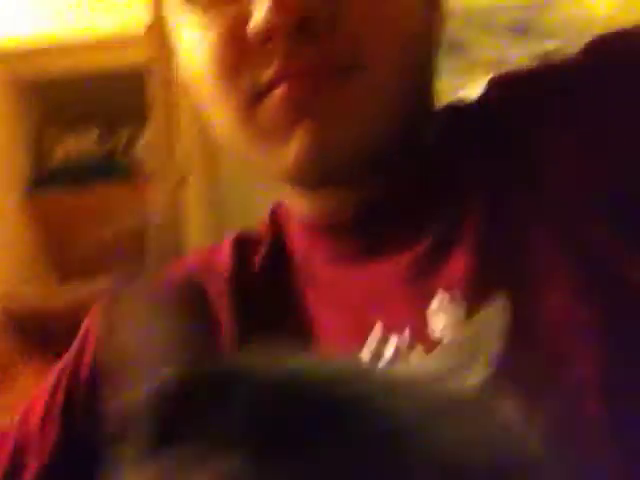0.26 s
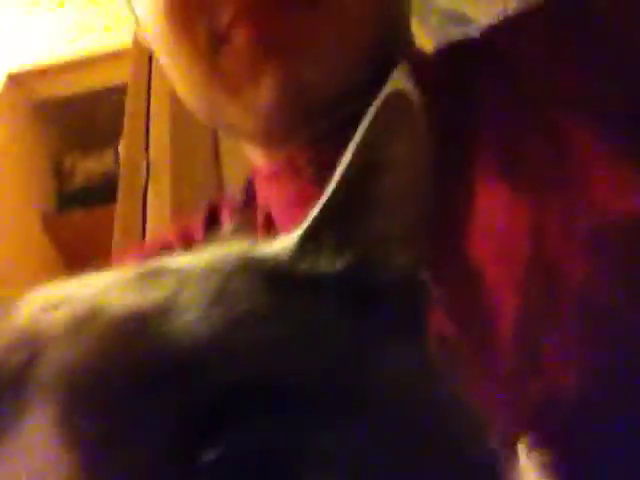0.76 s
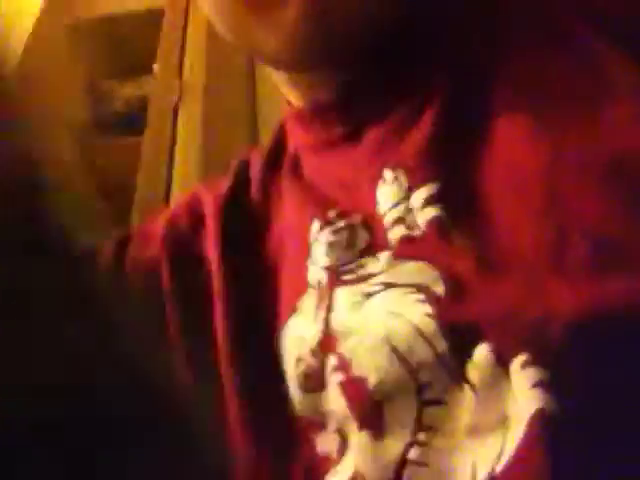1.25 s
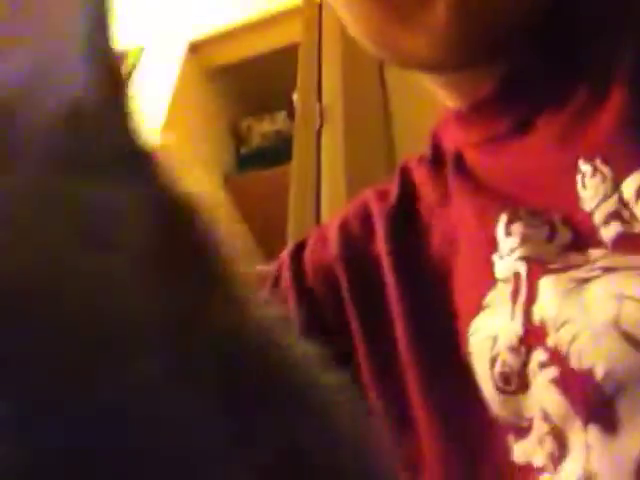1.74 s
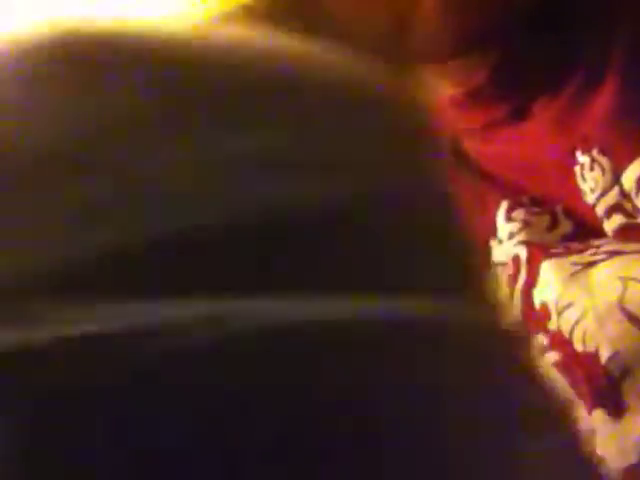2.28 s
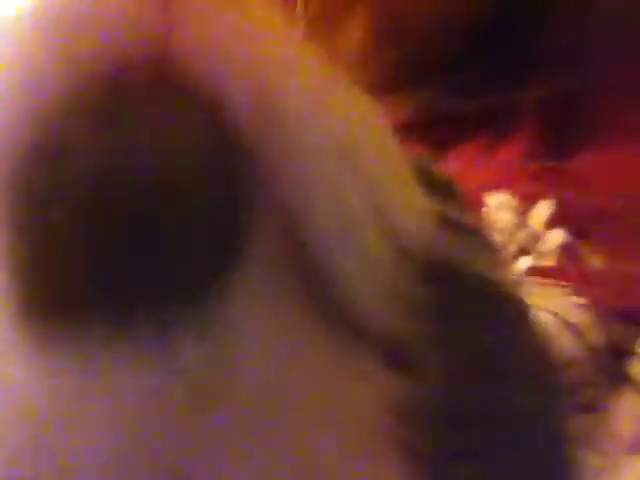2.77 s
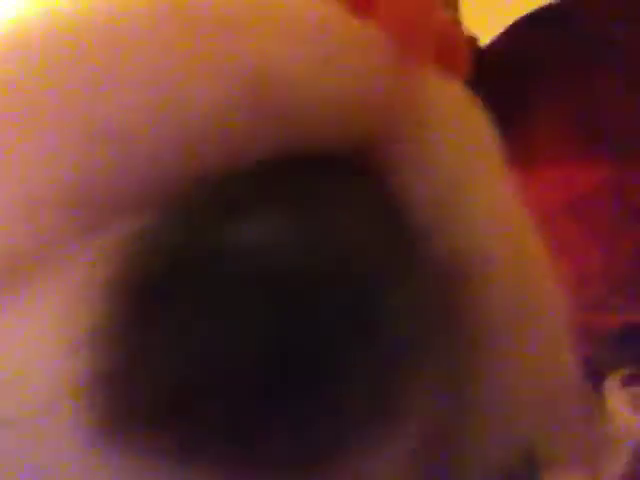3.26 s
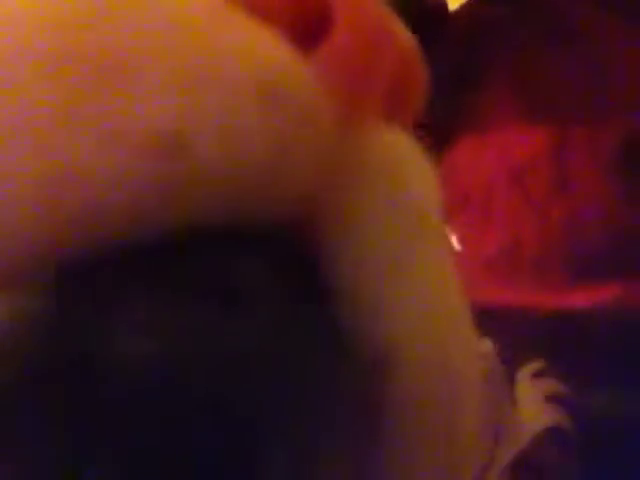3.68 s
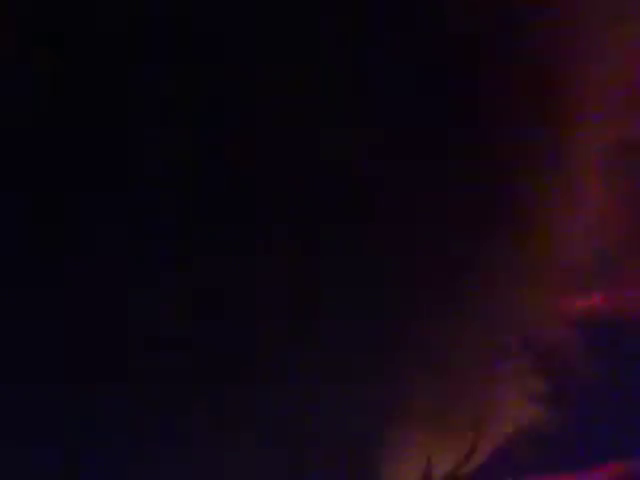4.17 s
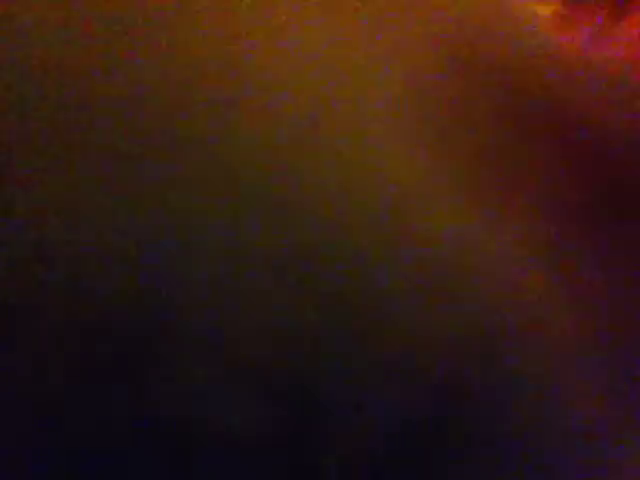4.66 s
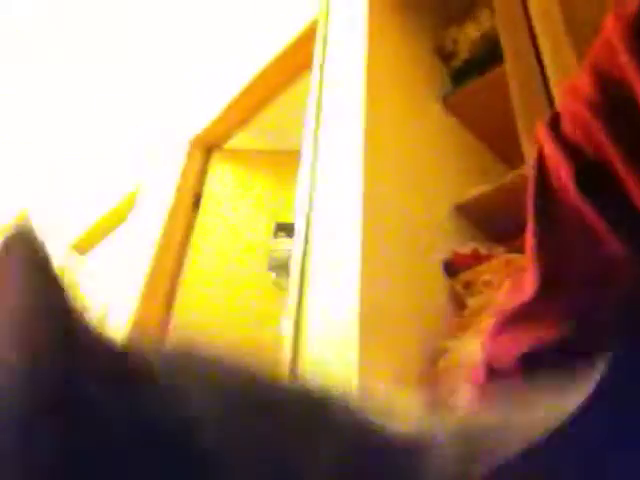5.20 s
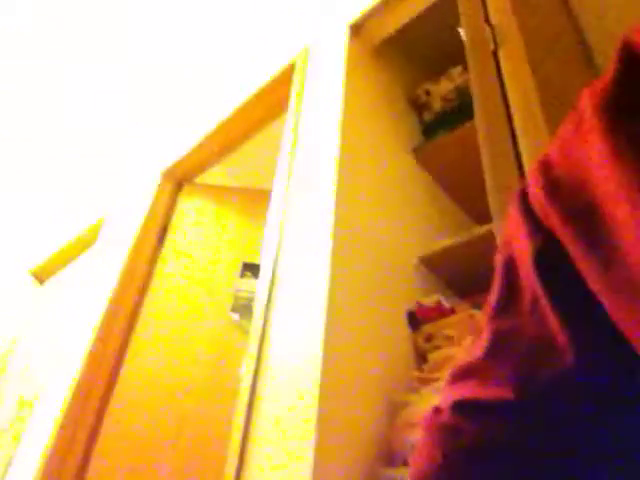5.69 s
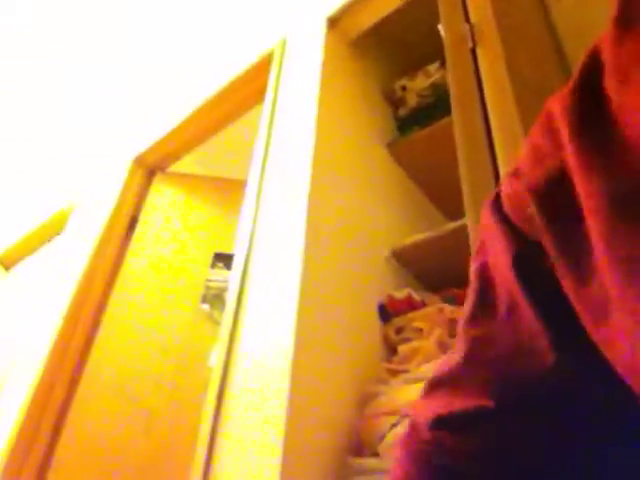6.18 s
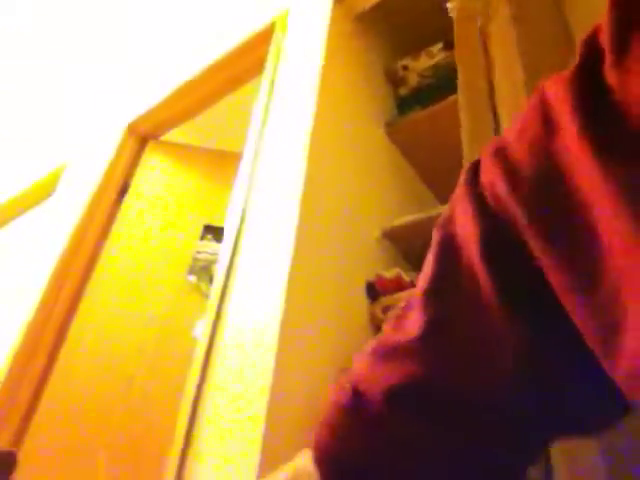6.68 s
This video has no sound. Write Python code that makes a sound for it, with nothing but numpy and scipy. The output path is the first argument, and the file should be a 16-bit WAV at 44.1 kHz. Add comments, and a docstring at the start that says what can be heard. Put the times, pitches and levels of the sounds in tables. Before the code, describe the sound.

A cat purrs very close to the microphone, with fur and cloth rustling and a few bumps and taps.

```python
"""A quiet room, a cat purring right at a hand-held mono microphone. Its larynx twitches about 26-30
times a second; each twitch lets out a puff of air and the folds flap once more. In the first second
fur and cloth rustle and the case takes a sharp tap. The cat moves away and nearer, and is loudest
around 4.6 s, where strong puffs and nudges thump the microphone. A few light taps follow, the purr
draws back after 5.5 s, and a sleeve slides past at 6.6 s."""
import sys
import numpy as np
from scipy import signal
from scipy.fft import rfft, irfft
from scipy.io import wavfile
from scipy.ndimage import uniform_filter1d

SR = 44100
rng = np.random.default_rng(int(sys.argv[2]) if len(sys.argv) > 2 else 0)


def dump(signal):
    """Clip the signal to [-1, 1] and save it as 16-bit WAV at the path in sys.argv[1]."""
    limited = np.clip(np.atleast_2d(signal).T, -1, 1)
    pcm = np.round(limited * 32767).astype(np.int16)
    wavfile.write(sys.argv[1], SR, pcm)


N = 306054
TIME = np.arange(N) / SR


def from_db(db):
    """Gain of a level in dB."""
    return 10 ** (np.asarray(db) / 20)


def rms_one(x):
    """The signal scaled to rms 1."""
    return x / np.sqrt(np.mean(x ** 2) + 1e-20)


def drift(rate_hz):
    """A random wander of rms 1, mostly slower than rate_hz."""
    step, settle = 40, 2000
    r = np.exp(-2 * np.pi * rate_hz * step / SR)
    slow = signal.lfilter([1], [1, -2 * r, r * r], rng.standard_normal(N // step + settle + 2))[settle:]
    return np.interp(np.arange(N) / step, np.arange(len(slow)), rms_one(slow))


def band(x, low_hz, high_hz, order=2):
    """Butterworth band-pass."""
    return signal.sosfilt(signal.butter(order, [low_hz, high_hz], "band", fs=SR, output="sos"), x)


def resonate(x, modes):
    """Parallel resonances, each (frequency [Hz], width [Hz], peak gain [dB])."""
    out = 0
    for hz, width_hz, gain_db in modes:
        r = np.exp(-np.pi * width_hz / SR)
        zeros = np.array([1, 0, -1]) * (1 - r * r) / 2
        poles = [1, -2 * r * np.cos(2 * np.pi * hz / SR), r * r]
        out = out + from_db(gain_db) * signal.lfilter(zeros, poles, x + 1e-18)
    return out


def ring(clicks, hz, t60):
    """Each click sets off a sine that dies by 60 dB in t60 seconds."""
    r, w = from_db(-60 / (t60 * SR)), 2 * np.pi * hz / SR
    return signal.lfilter([0, np.sin(w)], [1, -2 * r * np.cos(w), r * r], clicks + 1e-18)


def decay(clicks, tau_s):
    """Each click starts an exponentially falling envelope."""
    return signal.lfilter([1], [1, -np.exp(-1 / (tau_s * SR))], clicks)


def clicks_at(times, sizes):
    """One-sample clicks at the given times."""
    out = np.zeros(N)
    np.add.at(out, np.clip(np.round(np.asarray(times) * SR).astype(int), 0, N - 1), sizes)
    return out


# Spectrum of the quiet room and the electronics: (frequency [Hz], relative density [dB])
ROOM_TONE = [(18, -45), (30, -22), (59, -41), (120, 9), (156, 8.5), (332, -1), (432, -15.5), (709, -11.5),
             (6540, -58), (13300, -31.5), (15500, -19)]


def room_tone(level_db=-60):
    """Steady noise of room and electronics: a low murmur with a thin hiss on top."""
    hz, db = np.transpose(ROOM_TONE)
    bins_hz = np.maximum(np.arange(N // 2 + 1) * SR / N, 1)
    colour = from_db(np.interp(np.log(bins_hz), np.log(hz), db))
    return from_db(level_db) * rms_one(irfft(rfft(rng.standard_normal(N)) * colour, N))


def room_tail(near, t60=.14, level_db=-25):
    """The small furnished room answers after 6 ms with a short dull tail, faint at this close range."""
    t = np.arange(int(.3 * SR)) / SR
    tail = band(rng.standard_normal(len(t)), 73, 3400) * from_db(-60 * t / t60) * (t > .006)
    return from_db(level_db) * signal.fftconvolve(near, tail / np.sqrt(np.sum(tail ** 2)))[:N]


# Resonances of the sleeve's cloth: (frequency [Hz], width [Hz], gain [dB])
SLEEVE_MODES = [(1300, 700, -7), (4200, 1200, -1), (8600, 1500, 0)]
# The sleeve's one pass: (time [s], half length [s], level [dB])
SLEEVE_PASS = (6.61, .06, -62)


def sleeve():
    """A sleeve slides past the microphone: a smooth swell of noise in the resonances of the cloth."""
    at_s, half_s, level_db = SLEEVE_PASS
    swell = np.exp(-((TIME - at_s) / half_s) ** 2)
    return from_db(level_db) * swell * rms_one(resonate(rng.standard_normal(N), SLEEVE_MODES))


# Strokes of fur and cloth by the microphone; rise and fall each span 10 dB:
# (time [s], rise [s], hold [s], fall [s], treble [dB], mids against treble [dB])
FUR_STROKES = [(0.187, 0.27, 0.17, 0.15, -39, -12.5), (.455, 0.042, 0.007, 0.027, -40.5, -5),
               (0.521, .05, 0.016, 0.077, -50.5, -10.5), (.67, .1, .12, 0.051, -51.5, -7.5),
               (0.92, 0.091, 0.016, 0.071, -67, -1.5), (1.14, 0.23, 0.32, 0.13, -57, -11.5),
               (1.61, 0.13, 0.083, 0.13, -59, -8.5), (1.797, 0.046, 0.018, 0.079, -68, 1),
               (2.12, 0.28, 0.066, 0.18, -65, -5.5), (2.49, 0.11, .02, 0.13, -61.5, -4.5),
               (2.72, 0.21, 0.11, 0.13, -54.5, -7.5), (2.905, 0.16, 0.057, 0.16, -56, -15.5),
               (3.373, 0.096, 0.055, 0.076, -59, -13.5), (3.77, 0.34, 0.026, 0.057, -66, -12),
               (4.2, 0.22, 0.3, 0.24, -65, -4), (4.585, 0.11, 0.13, 0.26, -54, -8.5),
               (4.852, .02, 0.012, 0.0073, -52, -6), (5.06, 0.06, 0.015, 0.1, -60, -3.5),
               (5.22, 0.11, 0.13, 0.27, -63.5, -8), (5.419, .04, 0.02, 0.056, -56, -1),
               (5.55, 0.11, 0.063, 0.66, -73, -1.5), (6.25, .15, 0.0093, 0.053, -69.5, -2.5),
               (6.566, 0.077, .02, 0.19, -61, -6.5), (6.924, 0.11, 0.026, .1, -67, 0)]
# Rustle left between strokes: (treble [dB], upper mids [dB], mids [dB])
RESTING_RUSTLE = (-74.5, -75.5, -77)


def stroke_levels():
    """Treble, upper mids and mids in dB: each stroke adds its power to the resting rustle."""
    power = from_db(RESTING_RUSTLE)[:, None] ** 2
    for at_s, rise_s, hold_s, fall_s, treble_db, mids_db in FUR_STROKES:
        before, after = (at_s - TIME) / rise_s, (TIME - at_s - hold_s) / fall_s
        shape_db = -10 * np.maximum(np.maximum(before, after), 0)
        ranges_db = treble_db + np.array([0, mids_db / 2 - 2, mids_db])
        power = power + from_db(ranges_db[:, None] + shape_db) ** 2
    return 10 * np.log10(power)


def rustle():
    """Fur and cloth fibres rub: dense grains in three ranges, each split into three flickering bands."""
    ranges_hz = [(7540, 21800), (2750, 7280), (543, 2650)]
    shared_flicker_db = .61 * drift(24.5)
    out = 0
    for (low_hz, high_hz), level_db in zip(ranges_hz, stroke_levels()):
        edges = np.geomspace(low_hz, high_hz, 4)
        range_rms = np.sqrt(2 * (high_hz - low_hz) / SR)
        grains = rng.standard_normal((3, N)) * from_db(.5 * rng.standard_normal(N))
        for k in range(3):
            flicker_db = shared_flicker_db + .71 * drift(18.1)
            contact_db = 1.8 * drift(1.5)   # the colour shifts as the contact moves
            gain = from_db(level_db + flicker_db + contact_db) / range_rms
            out = out + gain * band(grains[k], edges[k], edges[k + 1])
    return out


# Taps on the microphone's case: (time [s], strength [dB])
CASE_TAPS = [(.458, -8.5), (0.689, -36.5), (0.831, -43), (4.607, -43), (5.092, -49), (5.292, -66),
             (5.314, -50), (5.43, -57)]
# Modes of the case: (frequency [Hz], gain [dB], t60 [s])
CASE_MODES = [(177.2, -1, 0.05), (309.5, -8, 0.0083), (492.5, -4.5, 0.0231), (631, -19, 0.012),
              (874, -5, 0.014), (1020, -4, 0.0053), (1263, -4.5, 0.0056), (1453, -10.5, 0.012),
              (1655, -7.5, 0.013), (2150, -8.5, 0.01185), (2500, -20.5, 0.016)]


def case_taps():
    """Handling noise: each tap lands as a touch, a main blow and a rebound that ring the case."""
    times, tap_db = np.transpose(CASE_TAPS)
    blows = [(0, -5), (.0007, 0), (.0038, -5)]   # (delay [s], level [dB])
    clicks = sum(clicks_at(times + delay, from_db(tap_db + blow_db)) for delay, blow_db in blows)
    ringing = sum(from_db(gain_db) * ring(clicks, hz, t60) for hz, gain_db, t60 in CASE_MODES)
    colour = [(1351, 1400, -3), (330.6, 910, -7.5), (2450, 240, -15.5)]
    return resonate(band(ringing, 220, 2200), colour)


# Puffs and nudges straight onto the microphone: (time [s], strength [dB], pitch [Hz], t60 [s])
MIC_THUMPS = [(.689, -32, 425, 0.007), (.905, -36, 270, 0.027), (0.8335, -24.5, 308, 0.018),
              (4.406, -21.5, 270, 0.021), (4.5173, -18, 270, 0.016), (4.555, -19.5, 226, 0.015),
              (4.5887, -29, 281, 0.018), (4.629, -11, 222, 0.0089), (5.288, -40.5, 248, 0.096),
              (5.315, -32, 260, 0.011)]


def mic_thumps():
    """A soft push on the microphone rings briefly at a low pitch."""
    ringing = sum(ring(clicks_at([at_s], from_db(db + 1)), hz, t60) for at_s, db, hz, t60 in MIC_THUMPS)
    return signal.sosfilt(signal.butter(2, 700, fs=SR, output="sos"), ringing)


# Colour of the second flap's wet tick: (frequency [Hz], width [Hz], gain per pass [dB])
TICK_MODES = [(1000, 450, 0), (1500, 400, -6), (2150, 450, -4), (3800, 1800, -9)]


def wet_ticks(flaps):
    """Each second flap of the folds lets off a tiny noise burst, passed twice through its resonances."""
    bursts = decay(flaps, tau_s=.002) * rng.standard_normal(N)
    return rms_one(resonate(resonate(bursts, TICK_MODES), TICK_MODES))


# Resonances of the cat's nose: (frequency [Hz], width [Hz], gain [dB])
NOSE_MODES = [(830, 200, 0), (1060, 220, -5)]


def nose(snaps, airflow, hiss_db, lead_s=.0011):
    """The folds snap apart as each puff begins and ring the nose; air hisses through it more softly."""
    early_snaps = -np.roll(snaps, -round(lead_s * SR))
    ringing = rms_one(band(resonate(early_snaps, NOSE_MODES), 660, 1220, order=3))
    hiss = rms_one(airflow * resonate(rng.standard_normal(N), NOSE_MODES))
    return ringing + from_db(hiss_db) * hiss


# Resonances of the cat's chest: (frequency [Hz], width [Hz], gain [dB])
CHEST_MODES = [(132, 35, 3), (184, 40, -12), (350, 170, -2)]


def chest(pulses, width_ms=.72, curvature=.45):
    """Puffs of air, heard directly and through the chest that they ring."""
    # a bell-shaped flow, heard partly as its curvature: a suction pulse between two small pushes
    u = np.arange(-200, 201) / (width_ms * SR / 1000)
    puff = (curvature * u ** 2 - 1) * np.exp(-u ** 2 / 2)
    puffs = signal.fftconvolve(pulses, puff, "same")
    return rms_one(band(puffs + resonate(puffs, CHEST_MODES), 60, 700, order=1))


# Stretches of purring, each lasting until the next; nose, air and tick are set against the chest:
# (start [s], twitch rate [Hz], flap delay [ms], flap spread [ms], pause before it [dB],
#  nose [dB], flap strength [dB], air [dB], tick [dB])
PURR_STRETCHES = [(.110, 25.75, 10, .5, 0, -11, -10, 2, -31), (.888, 26.1, 10, .5, 0, -15, -11, -10, -35),
                  (1.149, 30.18, 10, .5, 0, -13, -5, -1, -27), (1.878, 26.05, 10, .5, -3, -18, -7, -9, -30),
                  (2.446, 26.7, 9, .8, -3, -13, -3, 0, -22), (2.521, 26.7, 8, 1.2, 0, -4, -1.5, -2, -13),
                  (3.014, 26.3, 10, .3, -8, -20, -9, -15, -38),
                  (4.152, 27.25, 14.5, .6, -12, -14, -3, -7, -17),
                  (4.713, 26.2, 10.5, .3, -17, -18, -13, -19, -39),
                  (5.133, 26.2, 10.5, .4, 0, -13, -10, -5, -33),
                  (5.513, 30.36, 10, .5, -14, -17, -6, -6, -29),
                  (6.040, 26.2, 10, .5, 0, -20, -6, -10, -29), (6.307, 30.6, 10, .5, 0, -25, -6, -13, -30),
                  (6.503, 26.25, 10, .5, 0, -17, -7, -3, -32)]


def twitches():
    """The larynx twitches evenly in each stretch: times, and the second flaps' strength, delay, spread."""
    ends = [row[0] for row in PURR_STRETCHES[1:]] + [N / SR]
    rows = []
    for (start, rate_hz, delay_ms, spread_ms, _, _, flap_db, _, _), end in zip(PURR_STRETCHES, ends):
        times = np.arange(start, end - .5 / rate_hz, 1 / rate_hz)
        rows += [(t, flap_db, delay_ms, spread_ms) for t in times]
    return np.transpose(rows)


def stretch_levels(lead_s=.046, fall_s=.077, rise_s=.094, blend_s=.05):
    """Pause, nose, air and tick in dB: just before a stretch the purr may dip, and its colour shifts."""
    starts, _, _, _, depths_db, nose_db, _, air_db, tick_db = np.transpose(PURR_STRETCHES)
    pause_db = sum(np.interp(TIME - start + lead_s, [-fall_s, 0, rise_s], [0, depth_db, 0])
                   for start, depth_db in zip(starts, depths_db))
    current = np.maximum(np.searchsorted(starts, TIME + lead_s + blend_s / 2) - 1, 0)
    colour_db = [uniform_filter1d(db[current], int(blend_s * SR)) for db in (nose_db, air_db, tick_db)]
    return pause_db, *colour_db


# The purr as the cat moves nearer or away and works harder or less: (time [s], level [dB])
PURR_AT_MIC = [(0, -65), (.3, -52), (.8, -57), (.9, -50), (1.08, -51.5), (1.15, -64.5), (1.28, -58.5),
               (1.5, -73.5), (1.75, -61.5), (1.95, -57), (2.15, -60.5), (2.4, -63), (2.55, -55),
               (2.89, -56.5), (2.96, -68.5), (3.15, -55), (3.6, -48), (3.8, -51), (4.0, -47.5),
               (4.25, -54.5), (4.4, -44.5), (4.48, -49), (4.62, -37), (4.8, -39), (4.92, -43), (5.1, -42),
               (5.13, -49), (5.45, -48.5), (5.6, -69.5), (6.08, -64), (6.15, -73), (6.42, -61.5),
               (6.72, -73), (6.84, -60.5)]


def purr(jitter_s=.00015, lead_s=.0013):
    """Close up, each twitch and second flap sounds through chest and nose and lets a rush of air by."""
    times, flap_db, delay_ms, spread_ms = twitches()
    timing, twitch_luck, delay_luck, flap_luck, tick_luck, snap_luck = (
        rng.standard_normal((len(times), 6)).T)
    times = times + jitter_s * timing - lead_s   # a puff starts just before its loudest swing
    flap_times = times + (delay_ms + spread_ms * delay_luck) / 1000
    twitch = clicks_at(times, from_db(.7 * twitch_luck))
    flap = clicks_at(flap_times, from_db(flap_db + 2 * flap_luck))
    snaps = clicks_at(times, from_db(2.5 * snap_luck)) + from_db(6) * flap
    airflow = decay(twitch + flap, tau_s=.006) + .53   # surges each cycle, never quite stops

    pause_db, nose_db, air_db, tick_db = stretch_levels()
    body = chest(twitch + .63 * flap)
    ticks = from_db(tick_db) * wet_ticks(clicks_at(flap_times, from_db(3 * tick_luck)))
    air = from_db(air_db) * rms_one(airflow * band(rng.standard_normal(N), 110, 468, order=3))
    nasal = from_db(nose_db) * nose(snaps, airflow, hiss_db=np.minimum(air_db, -6) - 4)
    level_db = np.interp(TIME, *np.transpose(PURR_AT_MIC)) + pause_db
    body_and_air_rms = np.sqrt(1 + from_db(air_db) ** 2)
    return from_db(level_db) * (body + air + nasal + ticks) / body_and_air_rms


def scene():
    """Cat, handling and room all reach one microphone, so both channels are alike."""
    near = purr() + mic_thumps() + case_taps()
    return np.tile(near + room_tail(near) + rustle() + sleeve() + room_tone(), (2, 1))


def record(dry, low_cut_hz=123.5, top_hz=16000, rumble_db=-88.5):
    """The small microphone loses the bass, the electronics add a faint rumble; the top is cut."""
    thin = signal.sosfilt(signal.butter(4, low_cut_hz, "high", fs=SR, output="sos"), dry)
    rumble = from_db(rumble_db) * rms_one(band(rng.standard_normal(N), 14, 41, order=1))
    return signal.sosfilt(signal.cheby2(16, 70, top_hz, fs=SR, output="sos"), thin + rumble)


dry = scene()
out = record(dry)
dump(out)
```